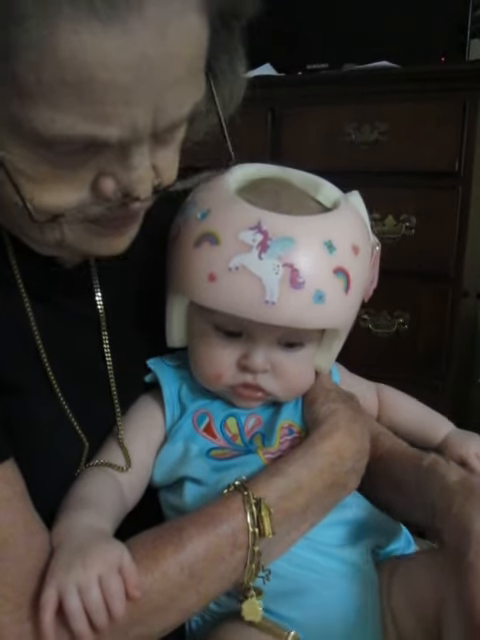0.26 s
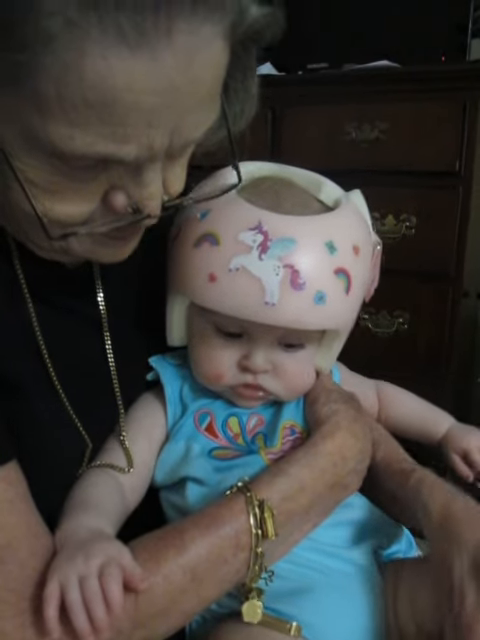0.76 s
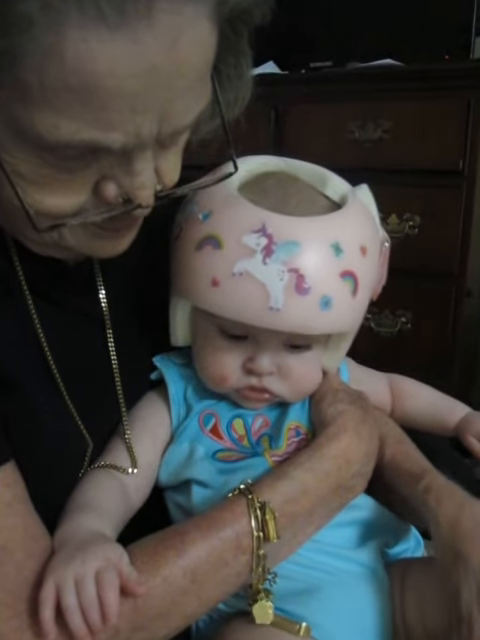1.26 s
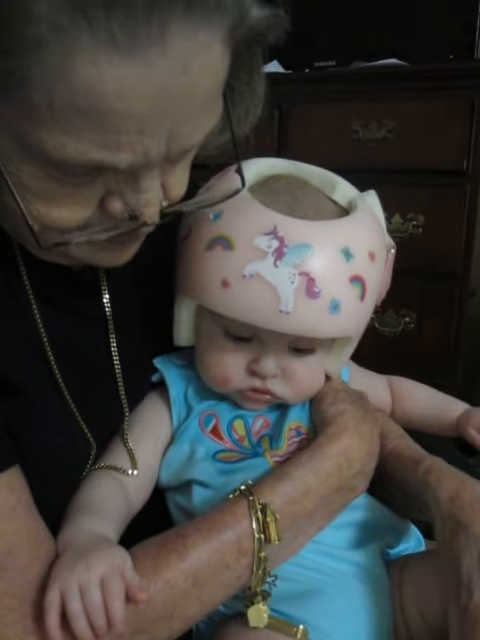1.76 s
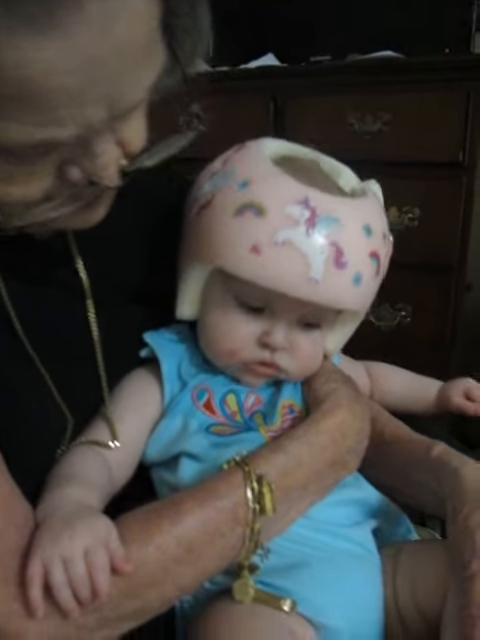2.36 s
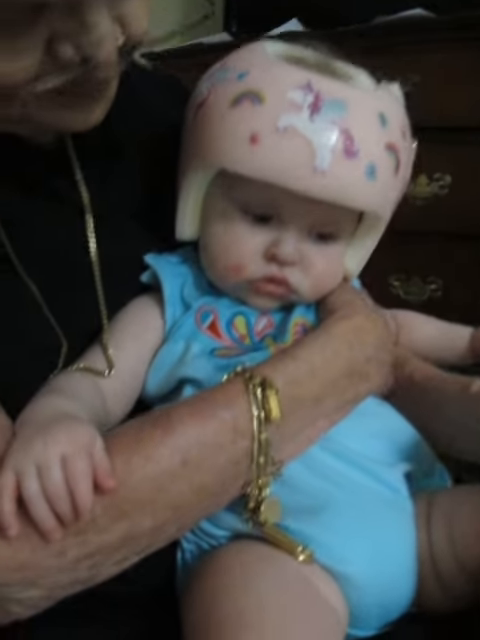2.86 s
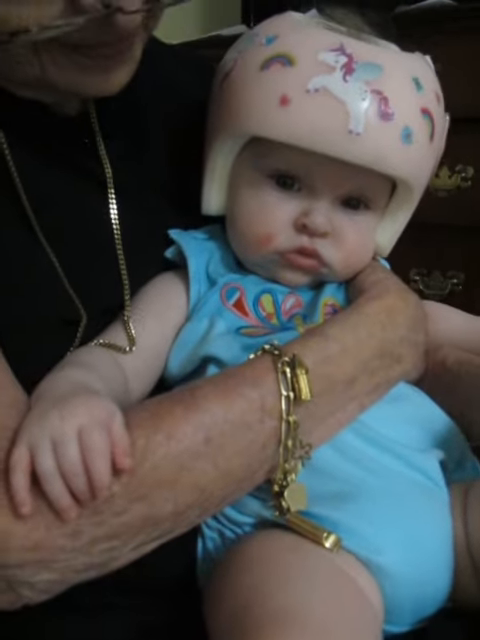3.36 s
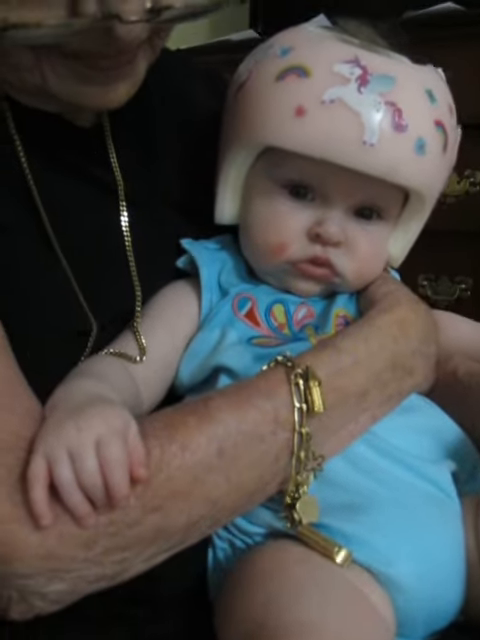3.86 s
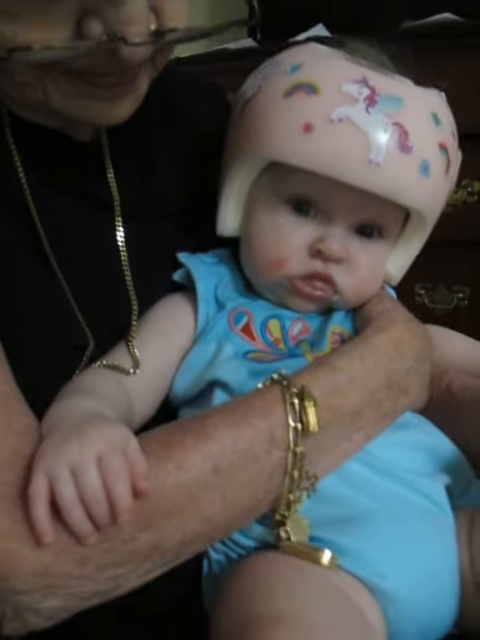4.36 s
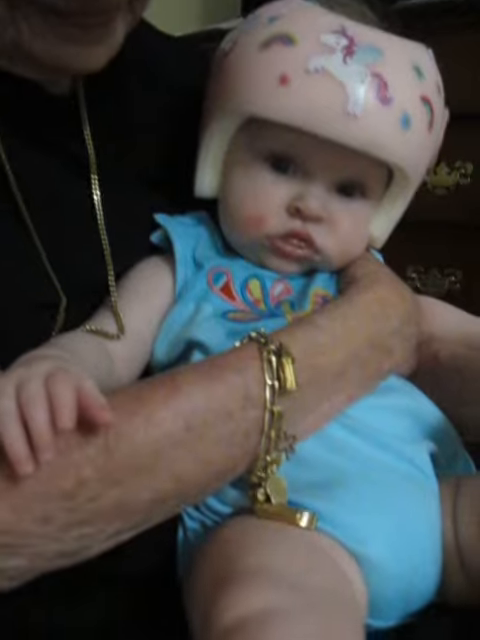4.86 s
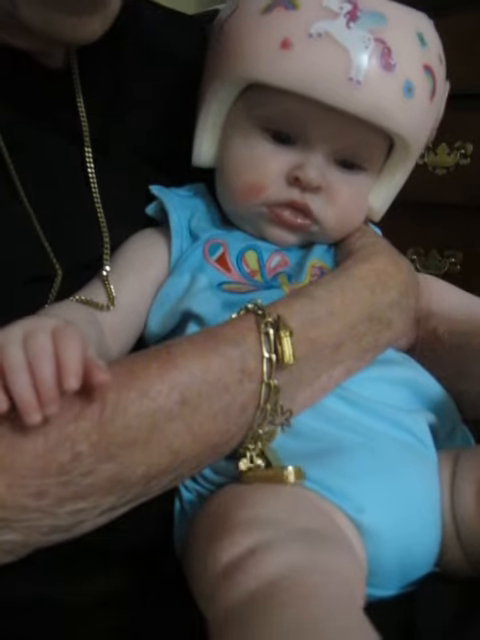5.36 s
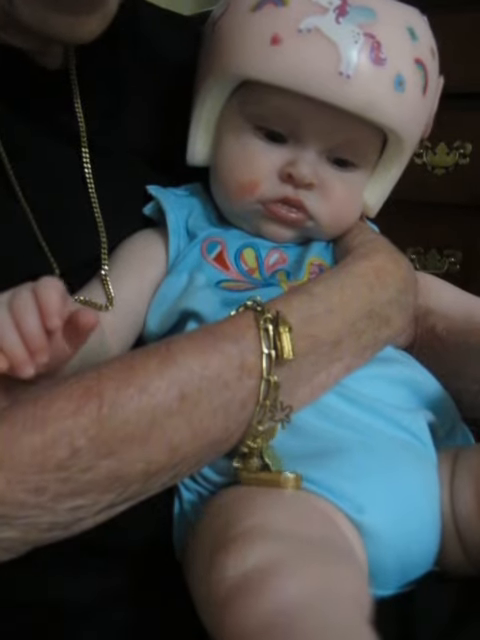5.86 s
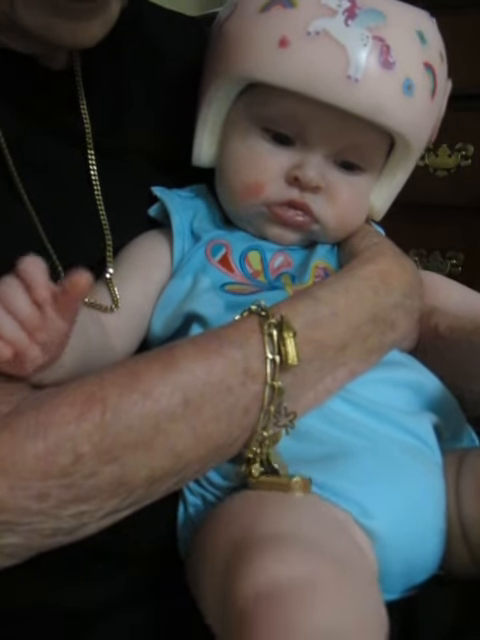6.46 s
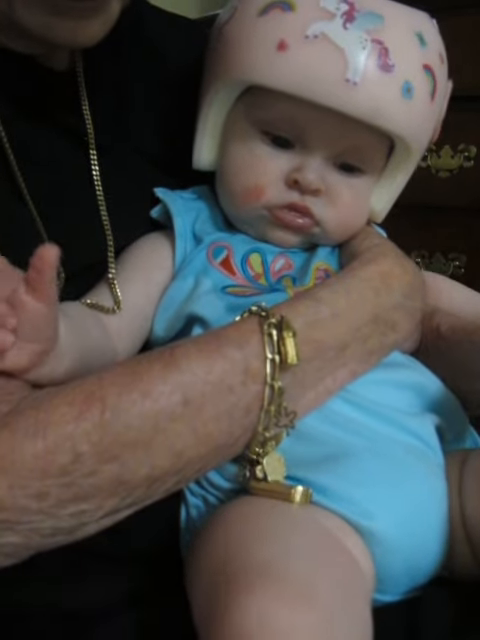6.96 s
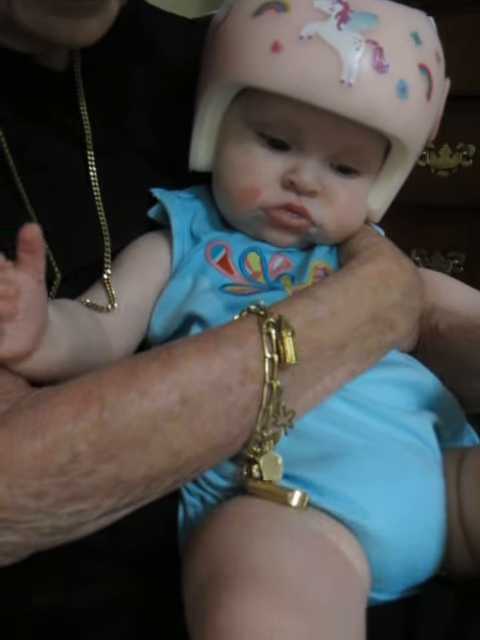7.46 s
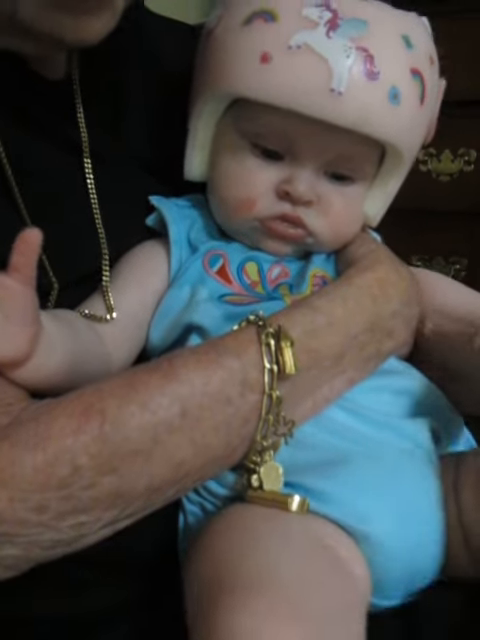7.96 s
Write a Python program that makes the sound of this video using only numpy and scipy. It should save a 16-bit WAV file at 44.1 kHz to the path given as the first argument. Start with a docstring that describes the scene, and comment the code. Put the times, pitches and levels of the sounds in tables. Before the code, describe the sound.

A charm bracelet jingles softly and irregularly close by, with faint cloth swishes and one plastic tap over a motor's hum.

```python
"""A gold charm bracelet clinks in loose bunches, close by, on an arm that holds a baby.
Its charms knock together and ring, and its chain ticks as the links slip. Now and then cloth
brushes and plastic taps. Behind it a motor and fan hum in a small room over a low rumble,
and a tiny drive in a camera whirrs. The steady tones shift in level once, as the camera moves."""
import sys
import numpy as np
from scipy import signal
from scipy.fft import rfft, irfft, next_fast_len
from scipy.io import wavfile
from scipy.ndimage import uniform_filter1d

SR = 44100
rng = np.random.default_rng(int(sys.argv[2]) if len(sys.argv) > 2 else 0)


def generate_wav(signal):
    """Clip the signal to [-1, 1] and save it as 16-bit WAV at the path in sys.argv[1]."""
    frames = np.transpose(np.atleast_2d(signal))
    scaled = np.clip(frames, -1, 1) * 32767
    pcm = np.round(scaled).astype(np.int16)
    wavfile.write(sys.argv[1], SR, pcm)


N = 361619
TIME = np.arange(N) / SR


def gain(db):
    """Turn decibels into a number to multiply by."""
    return 10 ** (np.asarray(db) / 20)


def unit(x):
    """Scale a signal to an average strength (rms) of 1."""
    return x / np.sqrt(np.mean(x ** 2))


def wander(rate):
    """A smooth random curve that heads for a new value `rate` times a second."""
    hold = int(SR / rate)
    steps = np.repeat(rng.standard_normal(N // hold + 1), hold)
    return unit(uniform_filter1d(uniform_filter1d(steps, hold), hold)[:N])


def noise(shape):
    """Noise whose strength at each frequency f follows shape(f)."""
    size = next_fast_len(N, real=True)
    hz = np.maximum(np.fft.rfftfreq(size, 1 / SR), 1)
    return irfft(rfft(rng.standard_normal(size)) * shape(hz), size)[:N] * np.sqrt(SR / 2)


def shaped_noise(points):
    """Noise that follows a curve of (Hz, dB) points."""
    hz, db = np.transpose(points)
    return noise(lambda f: gain(np.interp(np.log(f), np.log(hz), db)))


def noise_band(hz, width_hz):
    """Noise gathered around one pitch."""
    return unit(noise(lambda f: 1 / (1 + ((f - hz ** 2 / f) / width_hz) ** 2)))


def tones(rows, waver_db, drift, move_s=2.72):
    """Wavering tones whose levels change as the camera moves to another spot."""
    moved = .5 + .5 * np.tanh((TIME - move_s) / 0.23)
    out = 0
    for hz, before_db, after_db in rows:
        db = before_db + (after_db - before_db) * moved + waver_db * wander(6)
        phase = 2 * np.pi * (hz * TIME + rng.random()) + drift * wander(4)
        out = out + np.sqrt(2) * gain(db) * np.sin(phase)
    return out


def add(out, start, x):
    """Mix x into out from `start` seconds on."""
    i = max(int(start * SR), 0)
    out[i:i + len(x)] += x[:max(N - i, 0)]


def ring(notes, t60, detune, scatter_db, contact_s):
    """A struck thing rings, a bit differently each time. t60 is the ring time: seconds to fade 60 dB."""
    t = TIME[:SR // 8]
    hz, db, share = np.transpose(notes)[:, :, None]
    tune, weight = rng.standard_normal((2, len(notes), 1))
    decay = np.exp(-np.log(1000) * t / np.maximum(t60 * share, 1 / 1000))
    swell = 1 - np.exp(-(t / contact_s) ** 2)
    waves = np.sin(2 * np.pi * hz * (1 + detune * tune) * t)
    return swell * np.sum(gain(db + scatter_db * weight) * decay * waves, axis=0)


def crack(t60, low_hz, high_hz):
    """The short burst of noise when two things touch."""
    t = TIME[:SR // 8]
    band = signal.butter(2, [low_hz, high_hz], "bandpass", fs=SR, output="sos")
    return unit(signal.sosfilt(band, rng.standard_normal(len(t)))) * np.exp(-np.log(1000) * t / t60)


def chatter(x, gap_s, bounce_db):
    """A loose piece touches three more times, each time more softly."""
    out = x.copy()
    for k, lag in enumerate(np.cumsum(gap_s * (.5 + rng.random(3)))):
        out += gain(bounce_db * (k + 1)) * np.r_[np.zeros(int(lag * SR)), x][:len(x)]
    return out


def room(x, t60, echo_db):
    """Add the faint echo of a small furnished room."""
    t = TIME[:SR // 2]
    tail = rng.standard_normal(len(t)) * np.exp(-np.log(1000) * t / t60) * (t > .004)
    return x + gain(echo_db) * signal.fftconvolve(x, tail / np.linalg.norm(tail))[:N]


def rumble(level_db=-34, rise_s=1.7, rise_db=3.5, wander_db=2.6):
    """A deep throb near half the motor's turning rate; its level wanders and steps up once."""
    throb = noise_band(hz=27.8, width_hz=8.8)
    throb /= np.sqrt(uniform_filter1d(throb ** 2, SR // 6))  # even out its loudness
    risen = uniform_filter1d(1. * (TIME > rise_s), SR // 12)
    return throb * gain(level_db + rise_db * risen + wander_db * wander(2.95))


# The rush of air. Each row: frequency in Hz, level in dB per Hz.
AIR_CURVE = [(75, -71.5), (150, -72), (240, -72), (420, -78.5), (800, -87), (1400, -89.5), (2100, -94.5),
             (3300, -98), (4500, -96.5), (6500, -100), (9000, -99), (11000, -103), (13000, -109),
             (15500, -112)]
def air():
    """Moving air makes a soft, low rush that wavers a little."""
    return shaped_noise([(16, -55)] + list(AIR_CURVE)) * gain(0.91 * wander(5))


# The fan's tones. Each row: pitch in Hz, level in dB before the camera moves, level in dB after.
FAN_TONES = [(71.7, -61, -59), (112.2, -73, -58), (184.8, -56, -54), (220.5, -56, -57.5), (247.7, -60, -56),
             (409.3, -63, -68), (461, -63, -68), (1128, -70.5, -70.5)]
def fan():
    """A fan adds faint, unsteady tones."""
    return tones(FAN_TONES, waver_db=2.5, drift=1.08)


# The hum. Each row: multiple of the turning rate, level in dB before the camera moves, and after.
HUM_TONES = [(1, -42.5, -42.5), (2, -57, -59.5), (5, -53, -61), (6, -58, -60), (9, -64.5, -67),
             (10, -61, -60), (11, -45.5, -49), (12, -69.5, -101)]
def motor(shaft_hz=58.4):
    """A turning shaft hums at whole multiples of its turning rate."""
    rows = [(round(k) * shaft_hz, before, after) for k, before, after in HUM_TONES]
    return tones(rows, waver_db=.5, drift=0.039)


# The drive at rest. Each row: pitch in Hz, level in dB before the camera moves, level in dB after.
WHIRR_TONES = [(1240, -73, -63.5), (1274, -66, -61), (1312, -59.5, -60.5), (1356, -61.5, -60),
               (1370, -65, -62.5), (1441, -69.5, -68.5), (1475, -69.5, -68), (2530, -74, -73),
               (2804, -73.5, -68), (2890, -74, -73.5)]
# Its casing at rest. Each row: pitch in Hz, width in Hz, level in dB.
CASE_BANDS = [(2477, 130, -72.5), (2780, 210, -67), (3810, 250, -69.5), (4213, 120, -68), (5130, 520, -69),
              (6920, 740, -72), (8070, 320, -73)]
# The drive working hard. Each row: pitch in Hz, width in Hz, level in dB.
STRAIN_BANDS = [(1466, 66, -60.5), (1600, 170, -65), (3190, 280, -63.5), (4800, 220, -67), (6280, 400, -68),
                (7900, 1200, -63.5), (9900, 2600, -60.5)]
# When it works hard. Each row: start in seconds, end in seconds.
WORK_SPELLS = [(5.06, 5.34), (5.51, 5.82), (6.483, 6.9), (7.0, 7.26), (7.85, 9)]
def camera_drive(sizzle_db=-62.5, fade_db_per_s=0.32):
    """A tiny motor whirrs with a thin, pulsing sizzle; hard work makes the whirr higher and noisier."""
    working = sum(1. * ((TIME > start) & (TIME < end)) for start, end in WORK_SPELLS)
    effort = uniform_filter1d(working, SR // 12)
    rest = tones(WHIRR_TONES, waver_db=1.44, drift=0.88)
    rest += sum(gain(db) * noise_band(hz, width) for hz, width, db in CASE_BANDS)
    strain = sum(gain(db) * noise_band(hz, width) for hz, width, db in STRAIN_BANDS)
    strain *= gain(wander(20))
    pulse = 1 + 0.39 * np.sin(2 * np.pi * 30.7 * TIME + 1.2 * wander(3.7))
    buzz = 1 + 0.5 * np.sin(2 * np.pi * 292 * TIME)
    sizzle = gain(sizzle_db - fade_db_per_s * TIME) * pulse * buzz * noise_band(hz=10150, width_hz=330)
    return rest * (1 - 0.62 * effort) + sizzle * (1 - .5 * effort) + strain * effort


# The sound of cloth. Each row: frequency in Hz, relative level in dB.
CLOTH_CURVE = [(300, 2.5), (1500, -6), (4500, -7), (10000, -5.5), (15000, -20)]
# The swishes. Each row: middle in seconds, time to swell or fade in seconds, level in dB.
SWISHES = [(1.3, .1, -61), (2.085, 0.25, -59), (4.466, .05, -55), (4.76, 0.077, -54), (5.027, 0.05, -50),
           (5.57, 0.085, -57), (6.158, 0.069, -53), (6.728, 0.11, -53.5), (7.785, 0.032, -54)]
def cloth():
    """Cloth makes soft, grainy swishes as the arms shift."""
    speed = sum(gain(db) * np.exp(-((TIME - middle) / fade) ** 2) for middle, fade, db in SWISHES)
    grainy = shaped_noise(CLOTH_CURVE) * gain(3.1 * wander(250))
    return speed * unit(grainy)


# The plastic's notes. Each row: pitch in Hz, relative level in dB, share of the ring time.
PLASTIC_NOTES = [(505, -9, 1.14), (865, -2.5, 1.0), (1140, -1, 0.6), (1440, -7, 0.94), (1850, -2, 0.6),
                 (2070, 1, 0.47), (2370, -4, 0.78), (2840, -12.5, 0.92), (3210, -6, 0.86), (5530, -8, 0.38)]
# The taps. Each row: start in seconds, relative level in dB.
PLASTIC_TAPS = [(2.4187, -19), (2.769, -41), (2.918, -40), (3.972, -40), (5.549, -41), (6.139, -41),
                (6.726, -41)]
def plastic():
    """A tap on a light plastic shell gives a dry snap."""
    out = np.zeros(N)
    for start, db in PLASTIC_TAPS:
        knock = ring(PLASTIC_NOTES, t60=0.027, detune=0.022, scatter_db=0.5, contact_s=0.0013)
        snap = gain(-12) * crack(t60=0.017, low_hz=1090, high_hz=3500)
        add(out, start, gain(db) * (knock + snap))
    return out


# A link's notes. Each row: pitch in Hz, relative level in dB, share of the ring time.
LINK_NOTES = [(10120, -2.5, 0.92), (10700, -4, 1), (8600, -9, 0.98)]
# The slips. Each row: start in seconds, number of links, relative level of the first in dB.
CHAIN_SLIPS = [(0.1635, 1, -42), (0.2205, 1, -40), (2.1201, 1, -40.5), (2.7906, 1, -43.5), (4.6369, 1, -41),
               (5.1854, 2, -37), (6.3348, 3, -30), (6.38, 1, -36), (6.6957, 2, -40), (6.8583, 1, -41)]
def chain(gap_s=0.013, fade_db=4.5):
    """The chain slips link after link, each tick softer than the last."""
    out = np.zeros(N)
    for start, links, db in CHAIN_SLIPS:
        for k in range(round(links)):
            ping = gain(-2.5) * ring(LINK_NOTES, t60=0.023, detune=0.0246, scatter_db=1, contact_s=.0002)
            click = gain(-4) * crack(t60=0.0057, low_hz=6000, high_hz=13000)
            tick = chatter(ping + click, gap_s=0.011, bounce_db=-3.5)
            add(out, start + k * gap_s, gain(db - k * fade_db) * tick)
    return out


# The four charms' notes. Each row: pitch in Hz, relative level in dB, multiple of the ring time.
DISC_NOTES = [(8213, 2, 0.75), (8460, -7, 0.83), (8710, -0.5, 0.18), (4690, -17.5, 0.69), (12800, -32, .8)]
BAR_NOTES = [(7280, 6.5, 1.0), (6840, -2.5, 1.0), (3160, -10.5, 0.81)]
STAR_NOTES = [(12620, -3, 0.57), (14230, -15, .9), (7090, -10, 1), (4700, -14.5, 0.85)]
CLASP_NOTES = [(14800, -7, 0.73), (15250, -11, 3.2), (14100, -2, .8), (10000, -4, 0.48), (3320, -6.5, 0.84)]
# How a blow spreads. Each row: the charm struck, then relative dB for disc, bar, star and clasp.
BLOW_SPREAD = {"disc": (0, -16.5, -29, -40), "bar": (0, -9.5, -22, -37), "star": (-4, -15, 1, -24),
               "clasp": (2.5, -16, -13, -3)}
def clink(charm, t60):
    """One blow rings all four charms as their edges graze; skin and cloth quiet them quickly."""
    levels = BLOW_SPREAD[charm]
    tone = sum(gain(db + 1) * ring(notes, t60, detune=0.0048, scatter_db=1.3, contact_s=0.00044)
               for db, notes in zip(levels, (DISC_NOTES, BAR_NOTES, STAR_NOTES, CLASP_NOTES)))
    click = gain(-7.5) * crack(t60=0.0083, low_hz=8100, high_hz=10100)
    graze = gain(-20) * crack(t60=0.72 * t60, low_hz=3160, high_hz=13400)
    strength = np.linalg.norm(gain(levels))
    return chatter(tone + strength * (click + graze), gap_s=.005, bounce_db=-15)


# The clinks. Each row: start in seconds, relative level in dB, ring time in seconds,
# number of touches, the charm struck.
CHARM_HITS = [(0.423, -32, 0.032, 1, "star"), (1.27, -47, .044, 1, "star"),
              (4.0575, -33.5, .022, 1, "disc"), (4.3449, -40, .036, 1, "star"),
              (4.3533, -36, .016, 1, "disc"), (4.3711, -35.5, .02, 1, "disc"),
              (4.5294, -35, .017, 1, "star"), (4.5533, -30.5, 0.015, 1, "star"),
              (4.7734, -35, 0.031, 1, "star"), (4.781, -27, 0.02, 1, "disc"), (4.9748, -43, .054, 1, "bar"),
              (5.035, -38.5, .028, 1, "disc"), (5.1086, -36, .018, 1, "disc"),
              (5.2006, -36, .022, 1, "disc"), (5.224, -24.5, 0.024, 1, "bar"), (5.2325, -36, .05, 1, "bar"),
              (5.2536, -26, 0.038, 4, "disc"), (5.2593, -33, 0.035, 3, "clasp"),
              (5.2635, -29, 0.036, 3, "star"), (5.3712, -26.5, .017, 1, "bar"),
              (5.4407, -35, .021, 1, "disc"), (5.655, -25.5, 0.011, 1, "bar"),
              (5.7749, -32.5, 0.079, 1, "disc"), (5.799, -40, .06, 1, "clasp"),
              (5.817, -29, 0.055, 2, "disc"), (5.8424, -21.5, 0.021, 2, "disc"),
              (5.9024, -30, .039, 1, "bar"), (5.92, -34, .038, 1, "star"), (5.935, -26.5, 0.011, 2, "disc"),
              (5.972, -31, .014, 1, "disc"), (5.9907, -28.5, 0.018, 1, "disc"),
              (6.1698, -30.5, 0.0093, 1, "disc"), (6.3442, -42, 0.055, 2, "clasp"),
              (6.3917, -21.5, .045, 3, "disc"), (6.4617, -32, 0.028, 1, "bar"),
              (6.506, -37, 0.02, 1, "disc"), (6.5488, -32, .029, 1, "clasp"), (6.73, -32, .054, 1, "disc"),
              (6.7578, -35, 0.02, 1, "disc"), (6.7826, -19.5, 0.026, 1, "disc"),
              (6.7948, -28, 0.042, 1, "disc"), (6.9029, -35.5, .028, 1, "disc"),
              (7.7947, -37.5, 0.021, 1, "bar"), (7.8477, -36.5, .018, 1, "disc"),
              (8.045, -36, 0.056, 1, "disc")]
def charms(rebound_s=.0095, fade_db=3.5):
    """The bracelet's swinging charms strike and bounce back, ever more softly."""
    out = np.zeros(N)
    for start, db, t60, touches, charm in CHARM_HITS:
        for k in range(round(touches)):
            add(out, start + k * rebound_s, gain(db - k * fade_db) * clink(charm, t60))
        # the swinging disc brushes its neighbours a little later
        for delay in rng.uniform(0.012, 0.075, size=2):
            touch = ring(DISC_NOTES, t60=0.014, detune=0.0054, scatter_db=3.5, contact_s=0.00018)
            add(out, start + delay, gain(db - 21.5) * touch)
        # and tugs at its link as it swings
        for offset in .018 * rng.standard_normal(size=3):
            add(out, start + offset, gain(db - 26) * crack(t60=0.011, low_hz=7500, high_hz=15500))
    return out


def scene():
    """The close sounds echo faintly in the room, over the machines."""
    near = room(charms() + chain() + plastic() + cloth(), t60=0.18, echo_db=-15)
    background = motor() + fan() + air() + rumble() + camera_drive()
    return (near + background)[None]


def record(dry):
    """A steep filter cuts the highest treble, above 15900 Hz."""
    return signal.sosfilt(signal.ellip(10, .2, 80, 15900, fs=SR, output="sos"), dry)


dry = scene()
out = record(dry)
generate_wav(out)
```